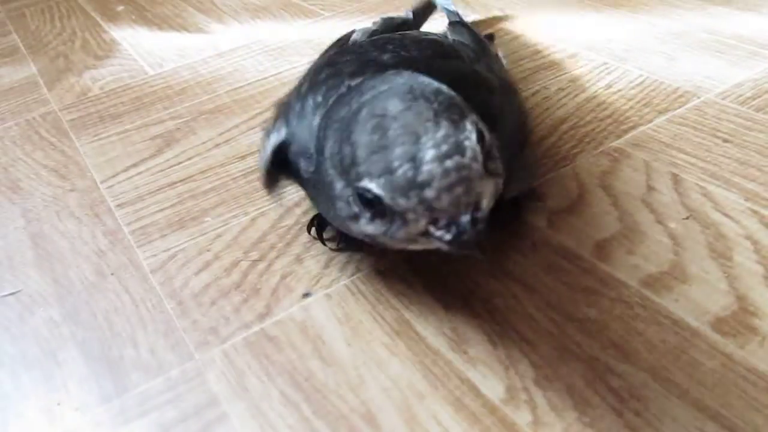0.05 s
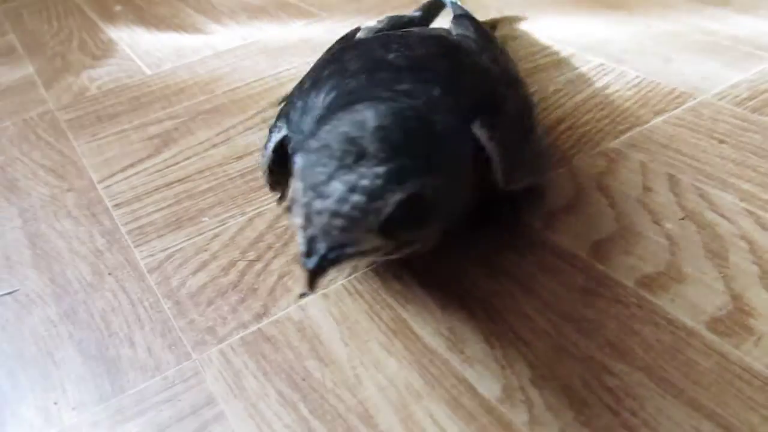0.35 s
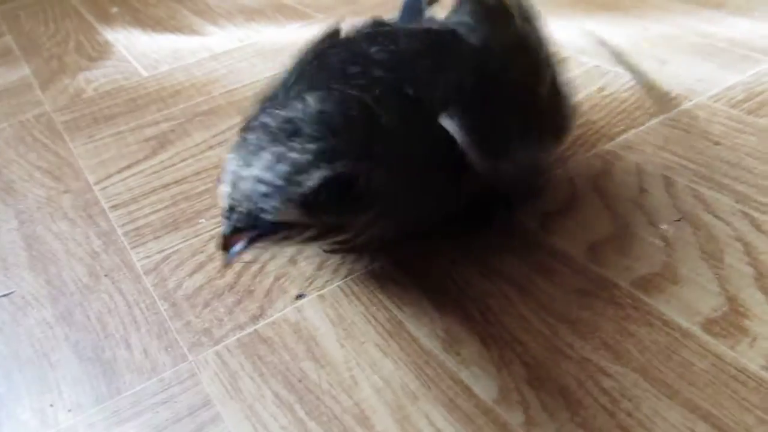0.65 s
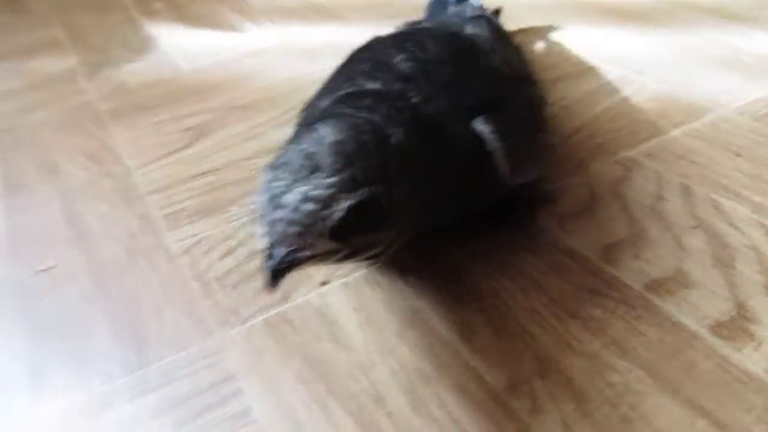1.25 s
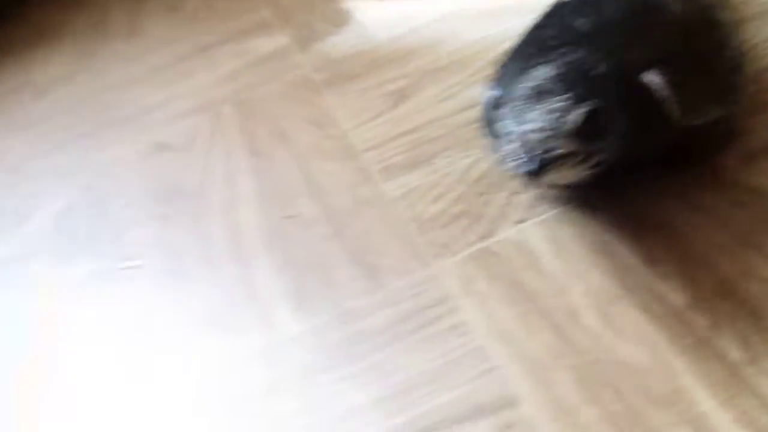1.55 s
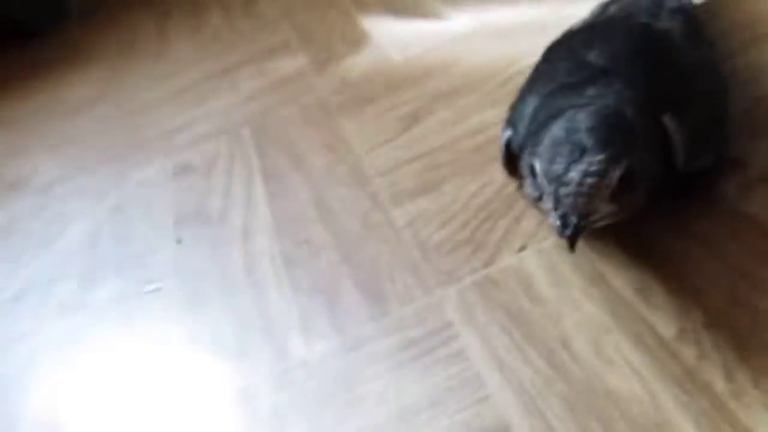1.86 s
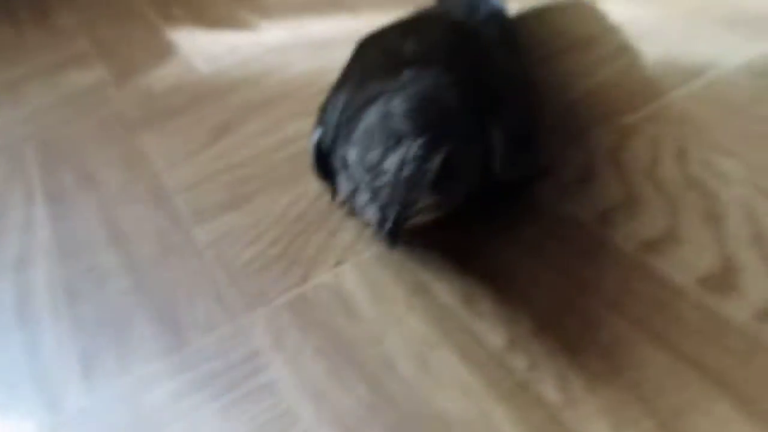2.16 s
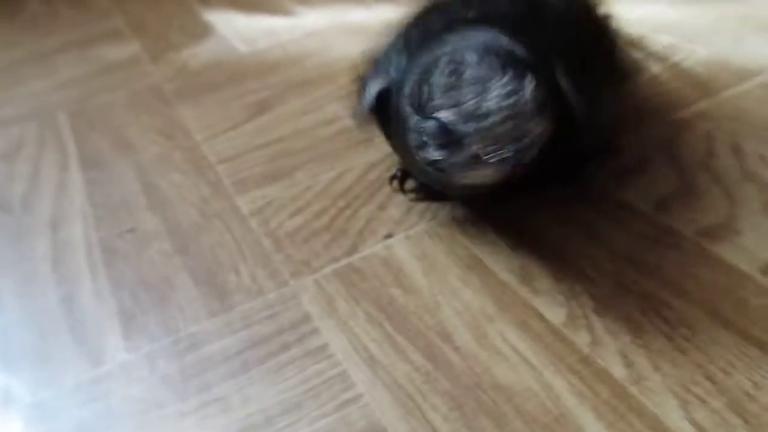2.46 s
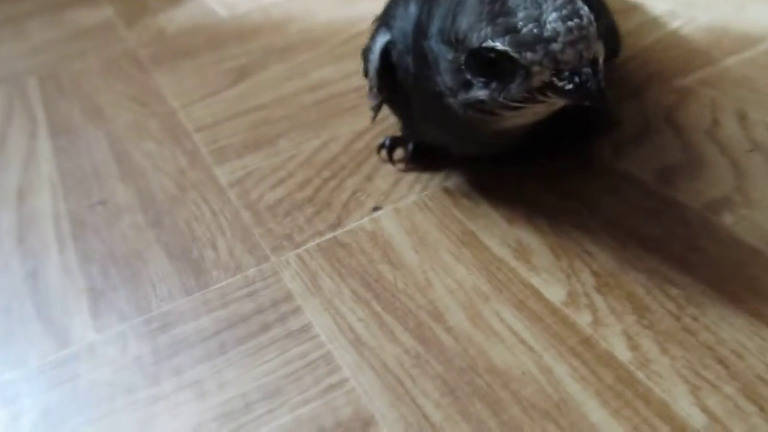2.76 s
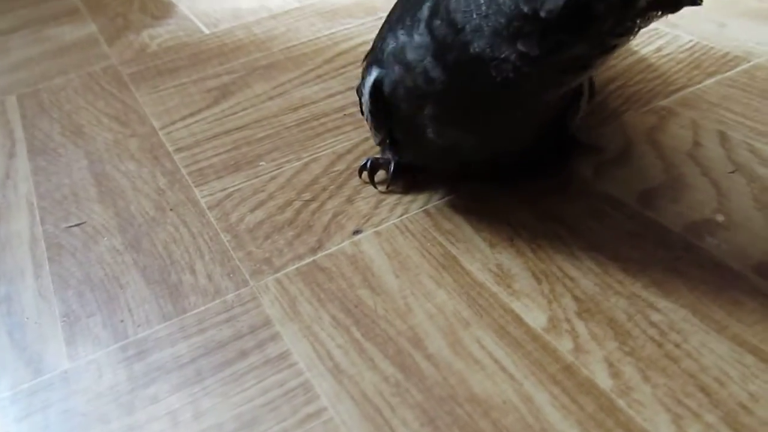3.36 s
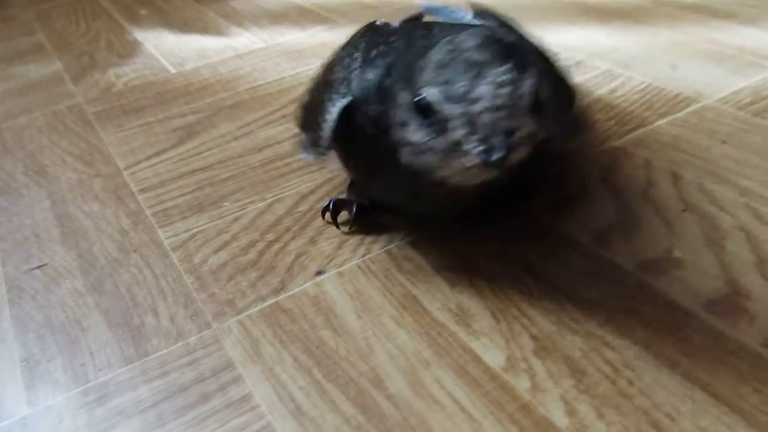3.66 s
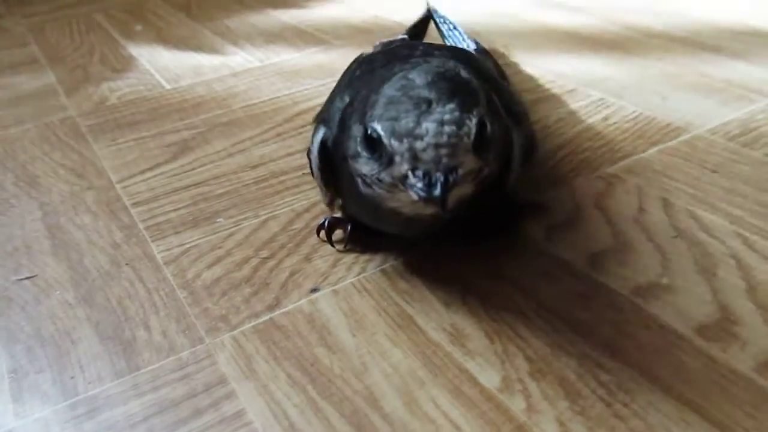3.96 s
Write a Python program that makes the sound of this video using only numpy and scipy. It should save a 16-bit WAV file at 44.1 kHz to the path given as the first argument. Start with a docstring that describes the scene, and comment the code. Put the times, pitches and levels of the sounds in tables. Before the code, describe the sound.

A young bird gives seven shrill, slightly raspy trills in quick succession, very close to the microphone. The calls shift a little to the right as it turns its head, over a faint fan hum in a small room.

```python
"""A swift chick on a wooden floor gives seven shrill begging trills, close to a pair of microphones.
Each trill is a whistled chain of notes that swell and sag around 6.5 kHz; pushed high, the voice breaks
and rasps. The chick turns its head as it calls, and a claw ticks once on the floor.
Behind it: a small room, a humming fan, faint hiss, a thin electrical whine over a drone, one dull thud."""
import sys
import numpy as np
from scipy import signal
from scipy.fft import rfft, irfft, next_fast_len
from scipy.io import wavfile
from scipy.ndimage import uniform_filter1d, map_coordinates

SR = 44100
rng = np.random.default_rng(int(sys.argv[2]) if len(sys.argv) > 2 else 0)


def log_audio(samples):
    """Write samples as a 16-bit WAV file to the path given in sys.argv[1]."""
    # one column per channel
    frames = np.atleast_2d(samples).T
    # limit to full scale, then quantise
    limited = np.clip(frames, -1, 1)
    pcm = np.round(limited * 32767).astype(np.int16)
    wavfile.write(sys.argv[1], SR, pcm)


N = 176400

# The bright colour of the hiss and the claw tick. Each row: frequency in Hz, relative level in dB.
AIR_SPECTRUM = [(2500, -14), (4300, 0), (13000, -11), (15000, -22)]


def amp(db):
    return 10 ** (np.asarray(db) / 20)


def unit(x):
    return x / np.sqrt(np.mean(np.abs(x) ** 2) + 1e-20)


def along(points, hz):
    """Read (Hz, value) points along a log frequency axis."""
    f, v = np.transpose(points)
    return np.interp(np.log(hz + 1), np.log(f + 1), v)


def automation(points):
    """Join (seconds, value) points into one value per sample."""
    return np.interp(np.arange(N) / SR, *np.transpose(points))


def wobble(rate):
    """A smooth random curve, rate knots a second."""
    knots = rng.standard_normal(int(N * rate / SR) + 4)
    return unit(map_coordinates(knots, [np.arange(N) * rate / SR]))


def filtered(x, response):
    """Equalise x by a gain that is a function of Hz."""
    m = next_fast_len(N + SR // 2)
    return irfft(rfft(x, m) * response(np.fft.rfftfreq(m, 1 / SR)), m)[..., :N]


def noise(spectrum, channels=1):
    """Coloured noise of rms 1."""
    return unit(filtered(rng.standard_normal((channels, N)), lambda hz: amp(along(spectrum, hz))))


def hiss(level_db=-52.5):
    """A faint, wide bed of air."""
    return amp(level_db) * noise(AIR_SPECTRUM, channels=2)


def fan(rush_db=-37.8, hum_db=-54, hum_hz=1046):
    """A fan's rush, wider in the treble, with one slightly wavering hum line."""
    # The colour of the rush. Each row: frequency in Hz, relative level in dB.
    spectrum = [(25, -14.5), (55, -12), (120, -8), (285, -4.5), (320, 6.5), (365, -9), (1000, -14),
                (1900, -12), (2600, -19.5), (3500, -20), (6000, -61)]
    # Its stereo image. Each row: frequency in Hz, left-right likeness (1 is mono).
    likeness = [(60, .65), (300, .97), (1200, .78), (2500, .15)]

    def mid_side_gains(hz):
        width = np.arccos(np.clip(along(likeness, hz), -1, 1)) / 2
        return np.array([np.cos(width), np.sin(width)])

    mid, side = filtered(noise(spectrum, channels=2), mid_side_gains)
    rush = unit(np.array([mid + side, mid - side]))
    hum = np.sqrt(2) * np.sin(2 * np.pi * hum_hz * np.arange(N) / SR + .5 * wobble(10))
    return amp(rush_db) * rush + amp(hum_db) * hum


def electrical_whine(whine_hz=15625, drone_hz=63.5, drone_db=-48):
    """A thin whine swells and fades, and a low drone of two partials swells with it."""
    # The whine's swell. Each row: time in seconds, level in dB.
    swell = [(1.1, -68), (1.85, -52), (2.9, -67)]
    t = np.arange(N) / SR
    level = amp(automation(swell))
    whine = level * np.sin(2 * np.pi * whine_hz * t)
    drone = sum(np.sin(2 * np.pi * k * drone_hz * t + .5 * wobble(3.7)) for k in (1, 2))
    return np.sqrt(2) * (whine + amp(drone_db) * np.sqrt(level / level.max()) * drone)


def thud(half_width_s=.022, rolloff_hz=170):
    """A soft, dull bump: a brief swell of low noise."""
    # The bump. Each row: time of its peak in seconds, level in dB.
    bumps = [(1.936, -34)]
    t = np.arange(N) / SR
    rumble = filtered(rng.standard_normal(N), lambda hz: np.sqrt(hz) * np.exp(-(hz / rolloff_hz)**2 / 2))
    return unit(rumble) * sum(amp(db) * np.exp(-((t - s) / half_width_s) ** 2) for s, db in bumps)


def claw_tick(at_s=1.066, level_db=-36, decay_s=.0068):
    """A tiny dry tick on the floor as the chick shifts its feet."""
    age = np.arange(N) / SR - at_s
    return amp(level_db) * noise(AIR_SPECTRUM, channels=2) * (age >= 0) * np.exp(-np.abs(age) / decay_s)


def room(x, level_db=-21, t60_s=.22):
    """A small room's short diffuse tail, different at each microphone."""
    t = np.arange(SR // 2) / SR
    tail = rng.standard_normal((2, len(t))) * amp(-60 * t / t60_s) * (t > .004)
    return amp(level_db) * signal.fftconvolve(x[None], tail / np.linalg.norm(tail[0]), axes=1)[:, :N]


def head_turn(x, centre_lead_us=15, lead_us_per_db=8):
    """The call gets louder and earlier at the microphone that the beak turns toward."""
    # Where the beak points. Each row: time in seconds, left minus right level in dB.
    beak = [(.27, -1.3), (.42, 0), (1.24, .3), (1.7, -7.8), (2.17, -2.6), (2.68, -6.8), (3.52, -8),
            (3.82, -4.6)]
    pan_db = automation(beak)
    left_lead = (centre_lead_us + lead_us_per_db * pan_db) * SR / 1e6
    pair = [amp(side * pan_db / 2) * map_coordinates(x, [np.arange(N) + side * left_lead / 2], order=5)
            for side in (1, -1)]
    return np.array(pair) / np.sqrt((amp(pan_db) ** 2 + amp(-pan_db) ** 2) / 2)


def phrasing():
    """Pitch, loudness, flutter and brightness: a trill flicks up, rides its notes and drops away."""
    # The trills. Each row: start in seconds, end in seconds, trim of overtone and rasp in dB.
    trills = [(-.03, .413, -.5), (.497, 1.002, -1.5), (1.098, 1.714, -1), (1.806, 2.225, 1),
              (2.322, 2.826, 1.5), (2.929, 3.291, 2), (3.409, 4.03, 2)]
    # Their notes. Each row: crest time in seconds, crest pitch in Hz, pitch of the sag after it in Hz,
    # level before accents in dB.
    notes = [(0.004, 6870, 6370, -19), (0.037, 7290, 6380, -19), (0.083, 6910, 6350, -20),
             (0.115, 6970, 6200, -16), (0.152, 7150, 6030, -20), (0.191, 8300, 6330, -17),
             (0.25, 6590, 6490, -18.5), (0.301, 6970, 6270, -18), (0.329, 7180, 6420, -19),
             (0.372, 7450, 6660, -18.5), (0.397, 7310, 7040, -16.5), (0.513, 7760, 6070, -20),
             (0.583, 7090, 6380, -18.5), (0.621, 7090, 6070, -16.5), (0.674, 6643, 6320, -18.5),
             (0.731, 6990, 6180, -13.5), (0.771, 7310, 6350, -18), (0.806, 7010, 6220, -18.5),
             (0.851, 6780, 5990, -17), (0.897, 7220, 6510, -16), (0.968, 7180, 6150, -17.5),
             (1.118, 7515, 6420, -16.5), (1.16, 6960, 6520, -21.5), (1.199, 7230, 6320, -20.5),
             (1.235, 6650, 5950, -21), (1.273, 7115, 6520, -22), (1.313, 7350, 6290, -19.5),
             (1.35, 7400, 6410, -21.5), (1.382, 7340, 6415, -20.0), (1.423, 7056, 6203, -19.5),
             (1.461, 7580, 6480, -20), (1.544, 6830, 6420, -17.5), (1.622, 6930, 6640, -19.5),
             (1.681, 7220, 6790, -16.5), (1.823, 7554, 6190, -19.5), (1.852, 7110, 6285, -22),
             (1.897, 7160, 6215, -23.5), (1.976, 7660, 6665, -22), (2.007, 7210, 6190, -22.5),
             (2.052, 7390, 6140, -23.5), (2.093, 7310, 5905, -22), (2.129, 6635, 6070, -20),
             (2.169, 6540, 5674, -23), (2.206, 6350, 6790, -19.5), (2.338, 7030, 6396, -22.5),
             (2.447, 7300, 6675, -20), (2.481, 7290, 6340, -19.5), (2.519, 7127, 6540, -17.5),
             (2.587, 7333, 6500, -15.5), (2.625, 7640, 6560, -15.5), (2.667, 7140, 6150, -15),
             (2.702, 7530, 6150, -16.5), (2.746, 7150, 6316, -14), (2.779, 7390, 6194, -15.5),
             (2.948, 7170, 6220, -17.5), (2.984, 6845, 6354, -16.5), (3.024, 6776, 6347, -16.5),
             (3.107, 7280, 6330, -16), (3.14, 6810, 6160, -16.5), (3.181, 6700, 6400, -17.5),
             (3.217, 6996, 6136, -18), (3.265, 7360, 5940, -19), (3.429, 8090, 6304, -19.5),
             (3.486, 6950, 6380, -19.5), (3.543, 6660, 6160, -18.5), (3.588, 6910, 6460, -20.5),
             (3.684, 6900, 6340, -16.5), (3.754, 6740, 6550, -17.5), (3.88, 6760, 6115, -17),
             (3.916, 6830, 6114, -16.5), (3.956, 7000, 6170, -17.5), (3.998, 7180, 6780, -29)]
    notes = np.array(notes)
    start_hz, rise_s, end_hz, fall_s = 5500., .009, 3736, .0045
    attack_s, release_s, accent_db, accent_s = .0026, .0038, 7, .011
    clear_hz, clear_span_hz = 5603, 914  # clear when low, more flutter as it rises
    t = np.arange(N) / SR
    pitch = np.full(N, start_hz)
    loud, flutter, bright_db = np.zeros((3, N))
    for start, end, trim_db in trills:
        crest_s, crest_hz, sag_hz, db = notes[(notes[:, 0] > start) & (notes[:, 0] < end)].T
        on = (t >= start) & (t < end)
        age, remaining = t[on] - start, end - t[on]
        sag_s = (crest_s + np.append(crest_s[1:], end)) / 2
        knots = np.column_stack([crest_s, sag_s]).ravel()
        note = np.interp(t[on], knots, np.arange(len(knots))) / 2  # whole at crests, half at sags
        height = 1 - np.abs(np.sin(np.pi * note)) ** 1.3
        low = sag_hz[note.astype(int)]
        high = crest_hz[np.minimum(np.round(note).astype(int), len(crest_s) - 1)]
        hz = low + height * (high - low)
        rise = np.minimum(1, (1 - np.exp(-age / rise_s)) / (1 - np.exp(-(crest_s[0] - start) / rise_s)))
        hz = start_hz + (hz - start_hz) * rise
        pitch[on] = hz + (end_hz - hz) * np.exp(-remaining / fall_s)
        gate = np.minimum(1, age / attack_s) * np.minimum(1, remaining / release_s) ** 2
        accent = np.exp(-(age / accent_s) ** 2)
        last_push = np.exp(-(remaining / accent_s) ** 2) / 2
        loud[on] = gate * amp(np.interp(t[on], sag_s, db) + accent_db * (accent + last_push))
        flutter[on] = (1 - accent) * (1 - np.exp(-(remaining / .019) ** 2))
        bright_db[on] = trim_db
    return pitch, loud, flutter * np.clip((pitch - clear_hz) / clear_span_hz, 0, 1), bright_db


def register_breaks(strain, base_rate_hz=95):
    """Irregular breaks, faster under strain: a saw that jumps up and slides back, a pulse at each jump."""
    gap_draw, size_draw = rng.standard_normal((2000, 2)).T
    marks = np.cumsum(np.exp(.5 * gap_draw))
    count = np.interp(np.cumsum(base_rate_hz * (1 + strain)) / SR, marks, np.arange(len(marks)))
    cycle = count % 1
    size = 1 + .5 * np.tanh(size_draw[count.astype(int)])
    saw = uniform_filter1d(size * (2 * (1 - cycle) ** 2 - 2 / 3), size=SR // 1300)
    pulse = np.exp(-(np.minimum(cycle, 1 - cycle) / .3) ** 2)
    return saw, pulse


def rasp(roughness, pulse, gain_db=-25.5):
    """Each break of a rough voice spits a puff of noise."""
    # The rasp's body and its airy top. Each row: frequency in Hz, relative level in dB.
    body = [(3400, -25), (4900, 3.5), (7500, 0), (9000, -44)]
    top = [(2000, 9.5), (10000, 21), (13300, 12.5), (14800, -11), (16000, -26)]
    puffs = unit(np.sqrt(np.abs(roughness)) * (.5 + 2 * pulse))
    return amp(gain_db) * puffs * (noise(body)[0] + noise(top)[0])


def overtone(phase, gain_db=-23, resonance_hz=13000, half_width_hz=900):
    """The whistle's weak octave, carried by a high resonance."""
    resonance = lambda hz: 1 / (1 + ((hz - resonance_hz) / half_width_hz) ** 2)
    return amp(gain_db) * filtered(np.sin(2 * phase), resonance)


def chick():
    """A shrill whistle with a weak octave; strain makes it break, flutter and rasp."""
    strain_hz, span_hz, flutter_hz = 6742, 709, 780  # the voice strains above strain_hz
    steady_hz, ceiling_hz = 5930, 8365  # the pitch jumps only between these
    jump_hz, dip_depth, jump_accent_db = 640, 1.1, 2
    pitch, loud, flutter, bright_db = phrasing()
    strain = np.clip((pitch - strain_hz) / span_hz, 0, 1)
    roughness = .1967 * flutter + .125 * strain
    broken = np.clip(2.8 * roughness, 0, 1) * np.clip((pitch - steady_hz) / span_hz, 0, 1)
    saw, pulse = register_breaks(strain)
    headroom = np.clip((ceiling_hz - pitch) / (2 * jump_hz), 0, 1)
    phase = 2 * np.pi * np.cumsum(pitch + jump_hz * broken * saw * headroom) / SR
    shake = unit(filtered(rng.standard_normal((2, N)), lambda hz: (1 + (hz / flutter_hz)**2 / 2) ** -2))
    level_shake, phase_shake = roughness * unit(.5 + pulse) * shake
    dips = 1 + dip_depth * broken * (pulse.mean() - pulse)  # the level ducks at each jump
    swell = dips * amp(jump_accent_db * broken * saw)
    whistle = np.sqrt(2) * ((swell + level_shake) * np.sin(phase) + phase_shake * np.cos(phase))
    edge = np.sqrt(2) * overtone(phase + 2 * phase_shake) + rasp(roughness, pulse)
    return loud * amp(wobble(130)) * (whistle + amp(bright_db) * edge)


def scene():
    """The chick up front, its room and the background behind it."""
    voice = chick()
    return head_turn(voice) + room(voice) + fan() + electrical_whine() + hiss() + thud() + claw_tick()


def record(dry, top_hz=16400):
    """Microphone colour and band limit."""
    # The microphones' treble notch. Each row: frequency in Hz, gain in dB.
    notch = [(7500, 0), (8700, -5), (10500, 0)]
    return filtered(dry, lambda hz: amp(along(notch, hz)) * (hz < top_hz))


dry = scene()
out = record(dry)
log_audio(out)
```